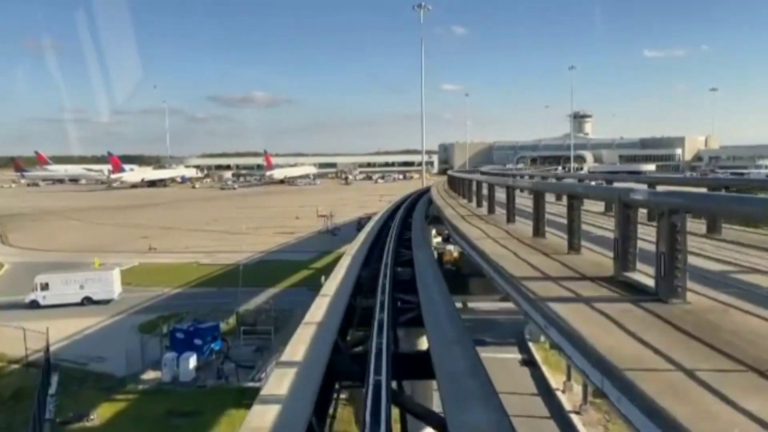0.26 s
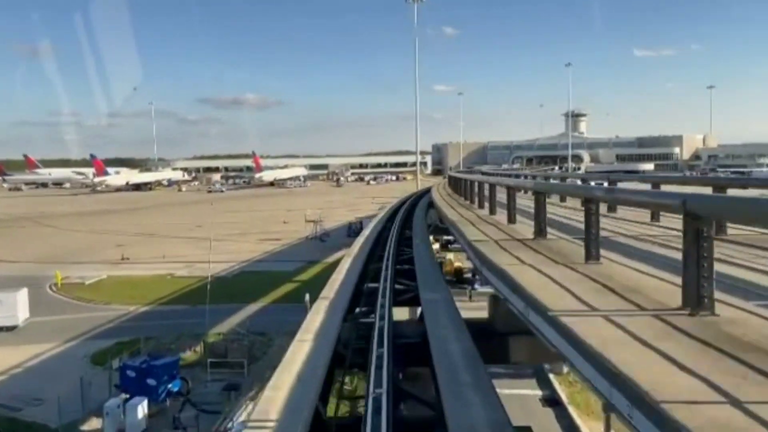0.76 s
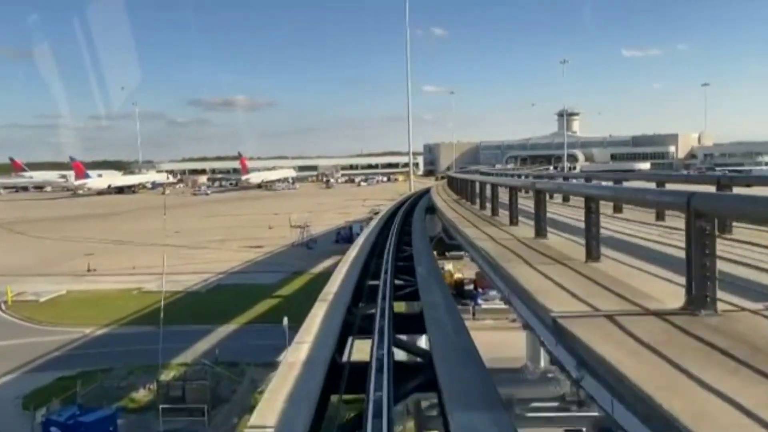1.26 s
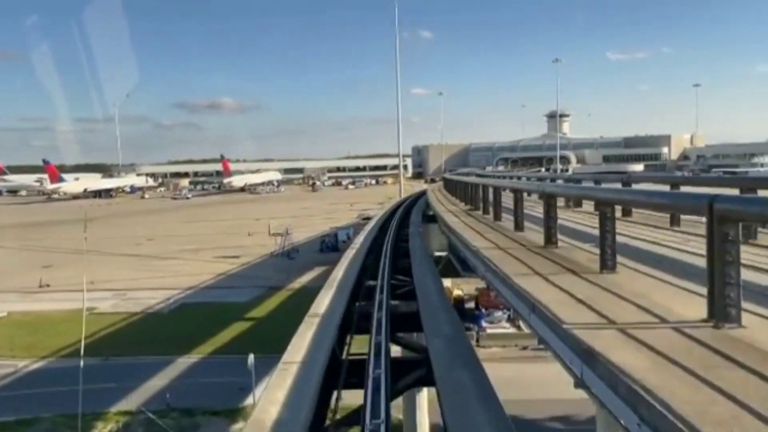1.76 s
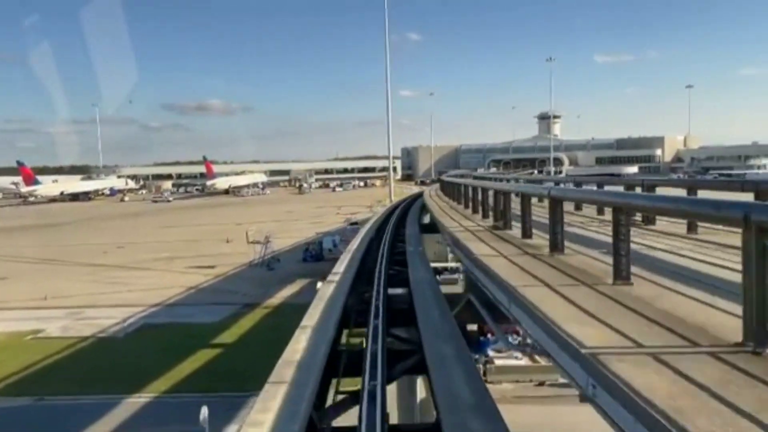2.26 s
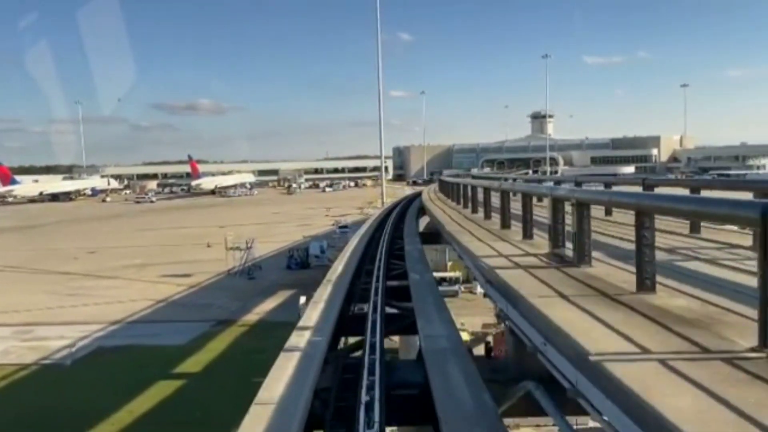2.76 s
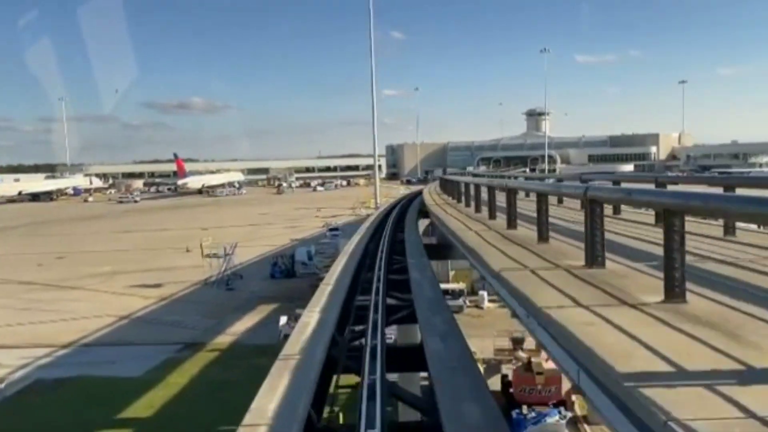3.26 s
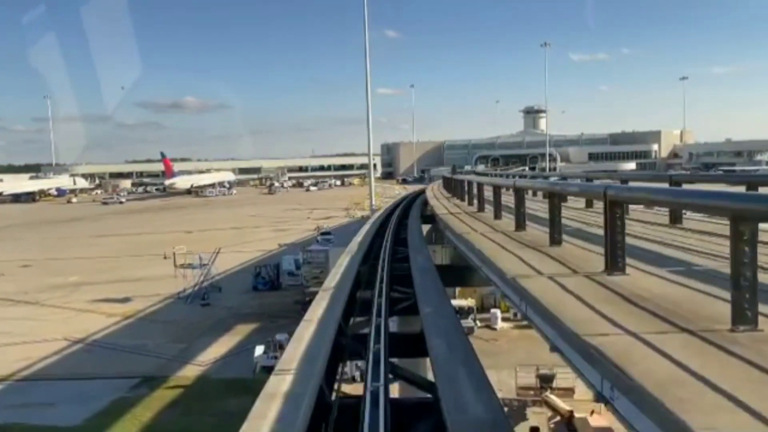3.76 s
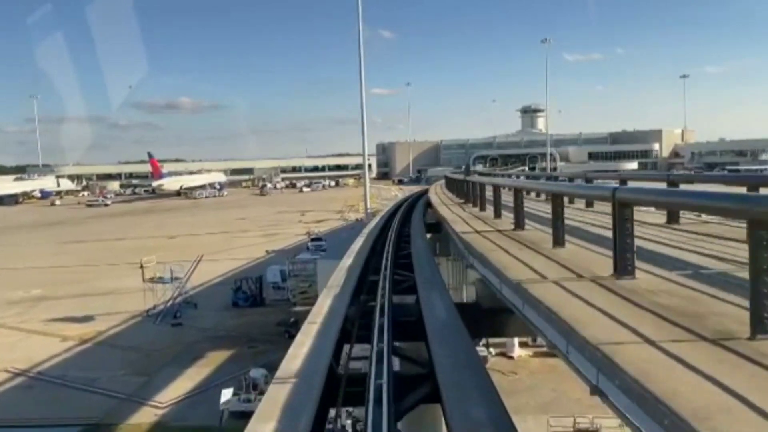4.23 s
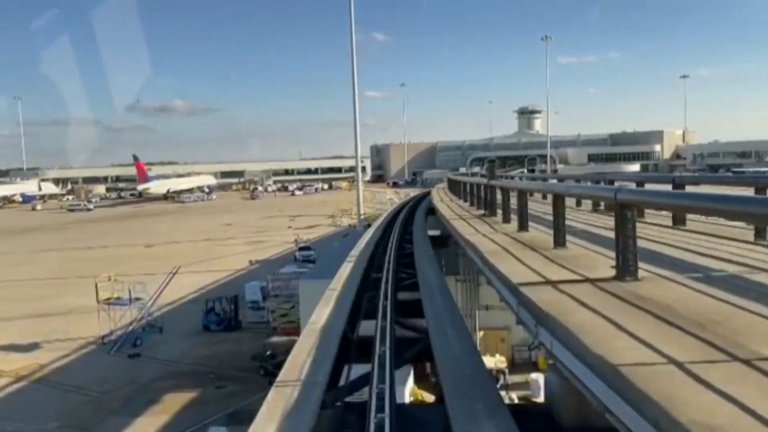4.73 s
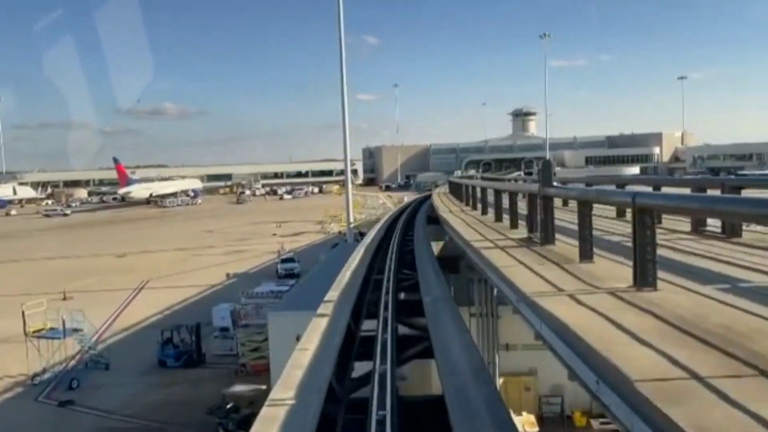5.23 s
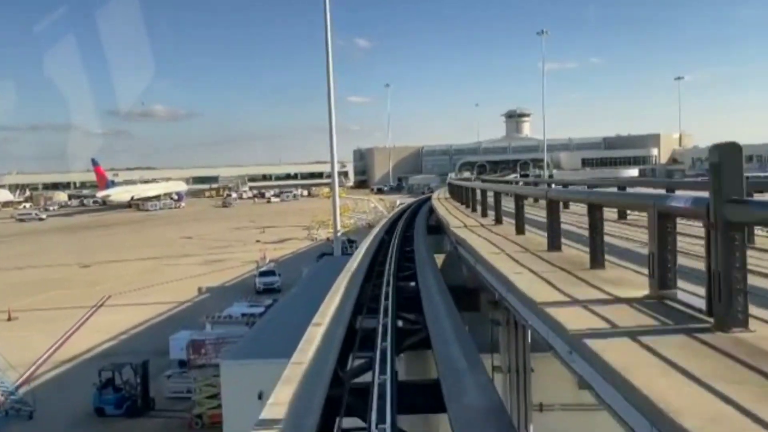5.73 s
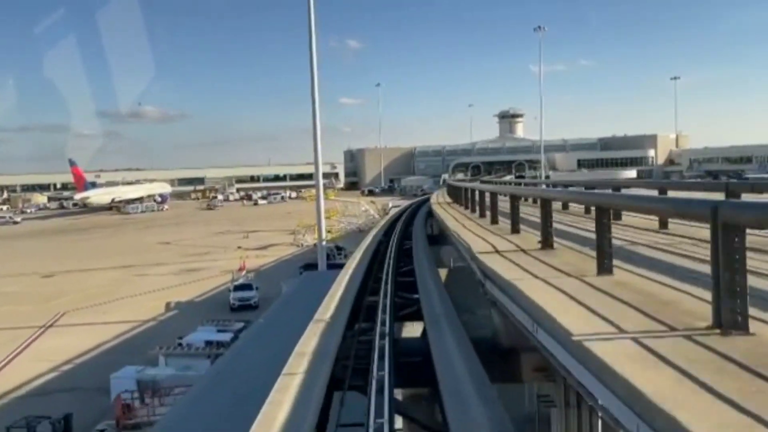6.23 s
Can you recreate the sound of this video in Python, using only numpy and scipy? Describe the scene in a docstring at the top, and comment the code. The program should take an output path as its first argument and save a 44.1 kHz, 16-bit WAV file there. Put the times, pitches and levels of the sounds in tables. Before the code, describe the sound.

Inside a rubber-tyred shuttle train, a steady deep drone and rumble run under faint whining, small creaks and soft thuds.

```python
"""Rubber-tyred train, inside the front car.

An automated train cruises along an elevated guideway. The drive makes the cabin boom at one low note,
which throbs at each wheel turn, with a quick shudder and brief irregular dips. Gears and motor whine
thinly above it. The tyres rumble on concrete, swell at each turn and thud over bumps.
The trim chatters, creaks and squeaks as the body flexes."""
import sys
import numpy as np
from scipy import signal
from scipy.fft import rfft, irfft
from scipy.io import wavfile
from scipy.ndimage import uniform_filter1d

SR = 44100
rng = np.random.default_rng(int(sys.argv[2]) if len(sys.argv) > 2 else 0)


def generate_wav(signal):
    """Clip the signal to [-1, 1] and save it as 16-bit WAV at the path in sys.argv[1]."""
    frames = np.transpose(np.atleast_2d(signal))
    scaled = np.clip(frames, -1, 1) * 32767
    pcm = np.round(scaled).astype(np.int16)
    wavfile.write(sys.argv[1], SR, pcm)


N = 286198
TIME = np.arange(N) / SR
HZ = np.fft.rfftfreq(N, 1 / SR)

# Throb at the wheel rate and a quick shudder. Each row: rate in Hz, swing of the boom in dB.
BOOM_THROBS = [(4.12, .7), (10.9, .9)]
# Brief drops of the boom. Each row: centre in seconds, depth in dB, width in seconds.
BOOM_DIPS = [(.045, 2, .025), (.24, 3, .025), (0.57, 7, 0.066), (0.703, 8, 0.024), (1.053, 8, 0.033),
             (1.65, 6, 0.019), (2.556, 6, 0.058), (2.96, 3, 0.026), (3.865, 10, 0.031), (4.582, 9, 0.027),
             (6.29, 8, 0.046)]
# Drive overtones. Each row: multiple of shaft speed, left and right base levels in dB.
BOOM_OVERTONES = [(2, -37, -37), (3, -45, -44), (3.987, -35.7, -38.5), (13 / 3, -42, -48), (5, -52, -51),
                  (5.41, -52, -50)]
# Track roughness. Each row: time in seconds, gain on deep rumble and boom overtones in dB.
SURFACE_ROUGHNESS = [(0, 1), (.5, 0.5), (1.05, 1.5), (1.55, -0.9), (3.05, -1), (3.45, -2.5), (3.95, -0.5),
                     (5.2, -1), (6.49, -0.5)]
# Gear tones. Each row: multiple of shaft speed, left and right base levels in dB, left lead in radians.
GEAR_TONES = [(6.5, -51, -44.5, 1.4), (6.58, -52, -56, .2), (7.98, -50.5, -41.5, .7), (9.928, -50, -52, .4),
              (10.96, -48.5, -53, 1.2), (11.005, -44.5, -53, 2.2), (14, -57.5, -56.5, 1),
              (17.95, -59.5, -56.5, 2), (19.96, -61.5, -56.5, 1.5), (21, -59, -60, 1),
              (22, -63.5, -58.5, 1.5)]
# Motor tone. One row, columns as for the gears.
MOTOR_TONE = (9.965, -39.5, -41.5, .4)
# Load on the gears. Each row: time in seconds, gain in dB.
GEAR_LOAD_DB = [(0, -3.5), (1.0, -11), (1.8, 3.5), (2.2, -0.5), (3.3, 2), (4.1, 0.5), (4.7, 1), (5.2, -0.5),
                (5.75, 5), (6.49, -2)]
# Load on the motor. Each row: time in seconds, gain in dB.
MOTOR_LOAD_DB = [(0, -10), (1.8, -9.5), (2.2, -2.5), (2.9, -6), (3.27, 2), (3.62, -5), (3.88, 2), (4.1, 0),
                 (4.33, 3.5), (4.97, 1), (5.27, -7), (5.48, 4.5), (6.49, 0)]
# Tyre rumble through the floor. Each row: frequency in Hz, relative density in dB.
RUMBLE_SPECTRUM = [(15, -31), (28, -14), (40, -29), (55, -0.5), (70, -4.6), (85, -6.4), (120, -12.5),
                   (140, -12.5), (180, -16.5), (210, -13.5), (260, -16.5), (290, -21), (350, -20),
                   (430, -19.5), (500, -25), (590, -20.5), (750, -32.5), (1000, -66.5)]
# Tyre roar and air along the body. Each row: frequency in Hz, base density in dB.
ROAR_SPECTRUM = [(500, -81.5), (780, -67), (900, -67.5), (1130, -68), (1400, -72.5), (1750, -76),
                 (2000, -80), (2700, -83.5), (3000, -88.5), (4200, -91), (6000, -97.5), (7800, -102),
                 (9200, -98), (11500, -100.5)]
# Cabin sound field. Each row: frequency in Hz, left-right likeness from -1 to 1, left lead in radians.
CABIN_FIELD = [(55, .997, 0), (90, .97, .05), (150, .9, .14), (280, .82, .05), (400, .62, .55),
               (550, .52, .65), (750, .3, 1.2), (1500, .15, 2.5), (2400, .42, .2), (4200, .42, .2),
               (7200, .2, 0), (8600, .55, 0), (10200, -.5, 0), (11500, .25, 0)]
# Colour of the trim panels. Each row: frequency in Hz, relative gain in dB.
PANEL_SPECTRUM = [(500, -29), (1200, 12.5), (1800, 7.5), (2600, 5), (3500, 4), (4600, 1), (6000, 2.5),
                  (7600, 0), (9200, -2.5), (11500, -1.5)]
# Modes of the panels and fittings. Each row: frequency in Hz, width in Hz, boost in dB.
PANEL_MODES = [(3580, 150, 2), (4400, 250, 2), (5400, 250, 2), (6100, 250, 1.5), (8340, 130, 4),
               (11100, 600, 2)]
# Trim creaks. Each row: peak time in seconds, relative level in dB, decay in seconds,
# treble over body in dB.
TRIM_CREAKS = [(0.042, -52.5, 0.052, -12), (0.238, -49, 0.087, -3), (0.458, -44.5, 0.067, -4),
               (0.538, -41, 0.02, 6), (0.777, -48.5, 0.043, -4), (0.9, -45, 0.048, -7),
               (1.512, -38, 0.023, 1), (1.654, -42.7, 0.034, 1), (1.755, -52, 0.042, -4),
               (1.98, -47.5, 0.061, -1), (2.038, -49, 0.031, -11), (2.146, -46.5, 0.036, -4),
               (2.296, -44, 0.057, 2), (2.393, -46, 0.041, -4), (2.443, -57, .025, -9),
               (2.498, -45, 0.065, -7), (2.904, -43.5, 0.041, -3), (2.956, -51, 0.024, -3),
               (3.224, -44, 0.024, 1), (3.318, -50, 0.022, 1), (3.392, -45.5, 0.026, 3),
               (3.442, -43.5, 0.039, 0), (3.478, -48, 0.014, -3), (3.523, -45, 0.034, -4),
               (3.736, -50, 0.034, 5), (3.872, -46, 0.1, 0), (4.12, -55, 0.08, 4), (4.637, -45.5, 0.024, 0),
               (4.703, -47, 0.052, 4), (4.838, -50, 0.04, -8), (5.394, -50.5, 0.062, 1),
               (5.638, -51, 0.048, 4), (5.93, -49, 0.04, 3), (6.368, -49.5, 0.032, 11),
               (6.455, -45, 0.054, -5)]
# Rubbing joints. Each row: peak time in seconds, decay in seconds, pitch in Hz, octave level in dB,
# gain on the other partials in dB, metal ring in Hz, ring level in dB.
JOINT_SQUEAKS = [(.475, .016, 1808, -40.5, -5, 8420, -68), (2.3, .026, 1772, -43.5, -2, 8370, -46),
                 (2.389, .027, 1822, -47.5, 9, 8430, -39.5), (2.445, .02, 1630, -51, -2, 8420, -66),
                 (2.78, .022, 2153, -49.5, -4, 8420, -70), (2.905, .02, 2433, -52, -6, 8420, -66),
                 (3.433, .022, 1750, -44, -5, 8420, -54), (3.527, .016, 1775, -47.5, 1, 8420, -62),
                 (3.54, .016, 2730, -47, -8, 8420, -70)]
# Partials of a squeak. Each row: multiple of the pitch, relative level in dB.
JOINT_PARTIALS = [(1, -1), (2, 0), (3, -12), (4, -15), (6, -16)]
# Track bumps. Each row: peak time in seconds, peak level in dB, floor note in Hz.
TRACK_BUMPS = [(.81, -24, 140), (1.05, -20, 83.8), (1.67, -20, 81.9), (2.1, -20, 107.7), (3.84, -25, 217.5),
               (3.975, -18, 85.6), (4.37, -25, 137.5), (4.57, -21.5, 78.4), (4.87, -25, 206.4),
               (6.30, -15, 77), (6.35, -27, 213.4), (6.43, -21, 88)]


def amp(db):
    """Decibels to gain."""
    return 10 ** (np.asarray(db) / 20)


def unit(x):
    """Scale to rms 1."""
    return x / np.sqrt(np.mean(x ** 2) + 1e-20)


def curve(rows):
    """Time table, interpolated per sample."""
    return np.interp(TIME, *np.transpose(rows))


def spectra(rows):
    """Columns of a frequency table, interpolated per bin."""
    hz, *columns = np.transpose(rows)
    return [np.interp(np.log(HZ + 1), np.log(hz + 1), column) for column in columns]


def band(x, reach_hz, order, centre_hz=0):
    """Pass reach_hz either side of the centre; a lowpass by default."""
    return irfft(rfft(x) / (1 + ((HZ - centre_hz) / reach_hz) ** order), N)


def wander(rate_hz):
    """Random drift of rms 1, up to about rate_hz."""
    white = rng.standard_normal(N)
    return unit(band(white - white.mean(), rate_hz, order=4))


def noise():
    """Two white noises, 0 dB per Hz."""
    return rng.standard_normal((2, N)) * np.sqrt(SR / 2)


def tone(turns, left_db, right_db, lead_rad=0):
    """Stereo sine at rms levels, with random starting phase."""
    angle = 2 * np.pi * (turns + rng.random())
    return np.sqrt(2) * np.array([amp(left_db) * np.sin(angle), amp(right_db) * np.sin(angle - lead_rad)])


def stroke(peak_s, decay_s, rise_ratio, fall_power):
    """Envelope: Gaussian rise to 1 at peak_s, then decay."""
    age = (TIME - peak_s) / decay_s
    exponent = np.where(age < 0, (age / rise_ratio) ** 2, abs(age) ** fall_power)
    return np.exp(-np.minimum(exponent, 20))


def cabin(pair, colour_db):
    """Colour and blend two unrelated signals: bass shared, middle diffuse."""
    likeness, lead_rad = spectra(CABIN_FIELD)
    left, other = rfft(pair)
    right = (likeness * left + np.sqrt(1 - likeness ** 2) * other) * np.exp(-1j * lead_rad)
    return irfft(np.array([left, right]) * amp(colour_db), N)


def patchy(pair, depth_db):
    """Narrow bands flare at random, as one patch of panel after another rings."""
    frames = signal.stft(pair, nperseg=1024, noverlap=768)[2]
    flare = rng.standard_normal(frames.shape[1:])
    flare = uniform_filter1d(flare, size=5, axis=0)
    flare = uniform_filter1d(flare, size=8, axis=1)
    gain = unit(amp(depth_db * unit(flare)))
    return signal.istft(frames * gain, nperseg=1024, noverlap=768)[1][:, :N]


def boom(shaft_turns, level_db, surface_db, flutter_db=1.3):
    """The shaft shakes the cabin; the note throbs, shudders and dips; rough track lifts its overtones."""
    throb_db = sum(db * np.cos(2 * np.pi * (hz * TIME + 0.2 * wander(1.5))) for hz, db in BOOM_THROBS)
    note_db = level_db + throb_db
    for centre_s, depth_db, width_s in BOOM_DIPS:
        note_db -= depth_db * 2 ** -np.minimum((2 * (TIME - centre_s) / width_s) ** 2, 20)
    out = tone(shaft_turns + 0.012 * wander(20), note_db - 0.1, note_db + 0.1)
    for order, left_db, right_db in BOOM_OVERTONES:
        turns = order * shaft_turns + 0.03 * wander(3.6)
        out += tone(turns, left_db, right_db, lead_rad=0.17) * amp(surface_db + flutter_db * wander(2.8))
    return out


def whine(shaft_turns, gear_flutter_db=2.2, motor_flutter_db=1.2):
    """Gear and motor tones waver as tooth load shifts; close pairs beat."""
    def wavering(order, left_db, right_db, lead_rad):
        turns = order * shaft_turns + 0.05 * wander(5.3) + 0.03 * wander(39)
        return tone(turns, left_db, right_db, lead_rad)
    gears = sum(wavering(*row) * amp(gear_flutter_db * wander(6)) for row in GEAR_TONES)
    motor = wavering(*MOTOR_TONE) * amp(curve(MOTOR_LOAD_DB) + motor_flutter_db * wander(10))
    return gears * amp(curve(GEAR_LOAD_DB)) + motor


def tyres(rumble_db, drone_db, roar_db, wheel_hz=4.12, first_swell_s=0.155, even_out_s=3.2):
    """Uneven rubber on concrete: bumps rumble, the tread drones up at each turn, fine grain roars."""
    wheel = np.cos(2 * np.pi * wheel_hz * (TIME - first_swell_s))
    floor = cabin(noise(), *spectra(RUMBLE_SPECTRUM)) * amp(-36.5)
    rumble = band(floor, reach_hz=270, order=8)
    tread = band(floor, reach_hz=70, order=4, centre_hz=598)
    tread_swing_db = 5 * np.exp(-TIME / even_out_s)
    drone = (floor - rumble - tread) * amp(0.24 * wheel) + tread * amp(tread_swing_db * wheel)
    roar = patchy(cabin(noise(), *spectra(ROAR_SPECTRUM)), depth_db=2.1)
    roar *= amp(0.5 * wander(42) + 0.36 * wheel)
    layers = (rumble, rumble_db), (drone, drone_db), (roar, roar_db)
    return sum(sound * amp(db - db.mean()) for sound, db in layers)


def slips(per_s, spread_db, patchy_db, ring_s=0.0045):
    """Dense tiny slips of uneven size, each ringing briefly in the panels; rms 1."""
    size = amp(spread_db * np.minimum(rng.exponential(1, N), 4))
    onsets = rng.random(N) < per_s / SR
    power = signal.lfilter([1], [1, -np.exp(-1 / (ring_s * SR))], onsets * size ** 2)
    modes_db = sum(db / (1 + (2 * (HZ - hz) / width_hz) ** 2) for hz, width_hz, db in PANEL_MODES)
    ringing = cabin(np.sqrt(power) * noise(), spectra(PANEL_SPECTRUM)[0] + modes_db)
    return unit(patchy(ringing, patchy_db))


def chatter(level_db, flex_db=1.7):
    """Panels rub constantly as the body flexes."""
    return slips(per_s=1600, spread_db=1.5, patchy_db=4.5) * amp(level_db + flex_db * wander(9.1))


def creaks(gain_db=2.2, faint_per_s=1.9, faint_decay_s=0.022):
    """Panels creak at each jolt, bright or dull; faint extra creaks fall at random."""
    slots_s = np.arange(0, N / SR, 1 / faint_per_s)
    faint_times_s = slots_s + rng.random(len(slots_s)) / faint_per_s
    faint = [(peak_s, -54 + rng.standard_normal(), faint_decay_s, 0) for peak_s in faint_times_s]
    rubbing = slips(per_s=3000, spread_db=1.2, patchy_db=3.2)
    body = band(rubbing, reach_hz=6000, order=4)
    body_gain = treble_gain = 0
    for peak_s, db, decay_s, bright_db in TRIM_CREAKS + faint:
        jolt = amp(db + gain_db) * stroke(peak_s, decay_s, rise_ratio=0.38, fall_power=1.05)
        body_gain += jolt * amp(-bright_db / 2)
        treble_gain += jolt * amp(bright_db / 2)
    return body * body_gain + (rubbing - body) * treble_gain


def squeaks(rough_db=3.0, pitch_jitter=0.021, ring_jitter=0.009):
    """Joints stick and slip at an unsteady pitch and excite a high metal ring."""
    ring_clock_s = np.cumsum(1 + ring_jitter * wander(300)) / SR
    rub_clock_s = np.cumsum(1 + pitch_jitter * wander(460)) / SR
    out = np.zeros((2, N))
    for peak_s, decay_s, pitch_hz, octave_db, others_db, ring_hz, ring_db in JOINT_SQUEAKS:
        rub = 0
        for order, partial_db in JOINT_PARTIALS:
            db = octave_db + partial_db + others_db * (order != 2)
            rub += tone(order * pitch_hz * rub_clock_s, db, db, lead_rad=1.0)
        ring = tone(ring_hz * ring_clock_s, ring_db, ring_db)
        out += (rub + ring) * stroke(peak_s, decay_s, rise_ratio=0.31, fall_power=1.14)
    return out * unit(amp(rough_db * wander(150)))


def bumps(decay_s=0.04):
    """Uneven spots in the track ring the floor briefly at a low note."""
    sway_turns = 0.042 * wander(21)
    out = np.zeros((2, N))
    for peak_s, db, hz in TRACK_BUMPS:
        note = tone(hz * TIME + sway_turns, db, db, lead_rad=0.061)
        out += note * stroke(peak_s, decay_s, rise_ratio=0.36, fall_power=0.66)
    return out


def scene():
    """The shaft settles to cruising speed; strain on the car builds to one peak and eases."""
    start_hz, cruise_hz, settle_s = 55.1, 54.735, 1.25
    strain_peak_s, build_s, ease_s = 3.39, 0.31, 0.5
    boom_base_db, boom_fall_db_per_s = -11.5, 0.58
    shaft_hz = cruise_hz + (start_hz - cruise_hz) * np.exp(-(TIME / settle_s) ** 2)
    shaft_turns = np.cumsum(shaft_hz) / SR
    from_peak_s = abs(TIME - strain_peak_s)
    strain = np.exp(-from_peak_s / np.where(TIME < strain_peak_s, build_s, ease_s))
    boom_db = boom_base_db - boom_fall_db_per_s * from_peak_s
    surface_db = curve(SURFACE_ROUGHNESS)
    drive = boom(shaft_turns, boom_db, surface_db) + whine(shaft_turns)
    rolling = tyres(rumble_db=surface_db, drone_db=2 * strain, roar_db=3 * strain) + bumps()
    trim = chatter(level_db=-52 + 5.5 * strain) + creaks() + squeaks()
    return drive + rolling + trim


def record(dry):
    """Soft ends, then a band limit."""
    edge_hz = 11880
    fades = signal.windows.tukey(N, 0.0015)
    lowpass = signal.firwin(201, edge_hz, window=("kaiser", 8), fs=SR)
    return signal.oaconvolve(dry * fades, lowpass[None], "same", axes=1)


dry = scene()
out = record(dry)
generate_wav(out)
```